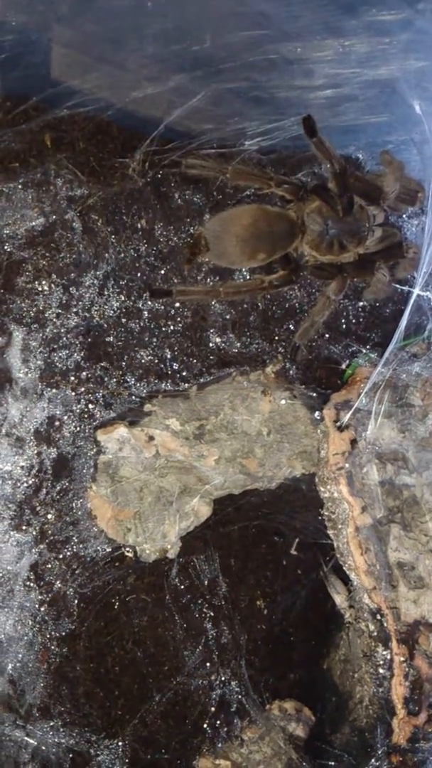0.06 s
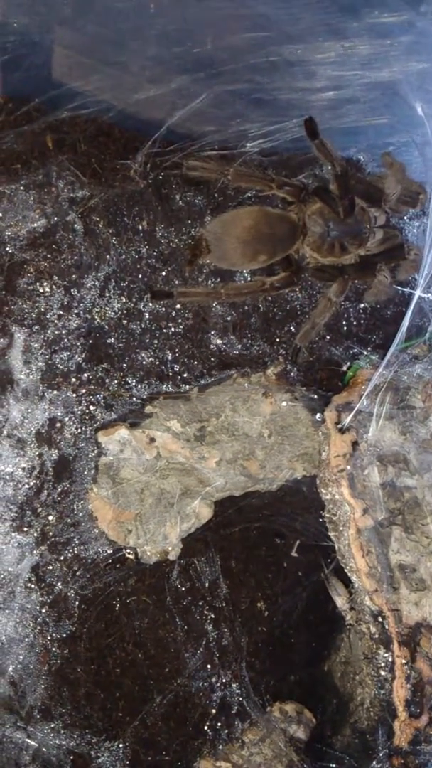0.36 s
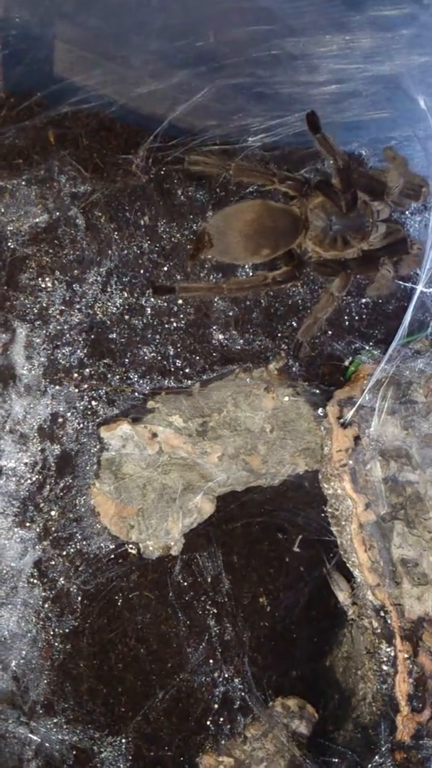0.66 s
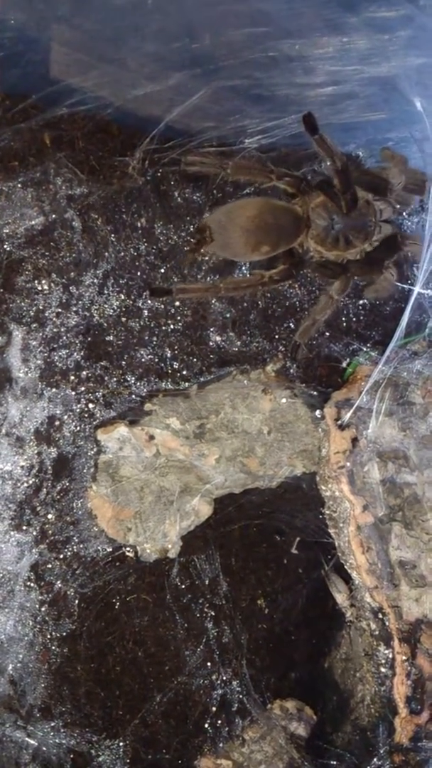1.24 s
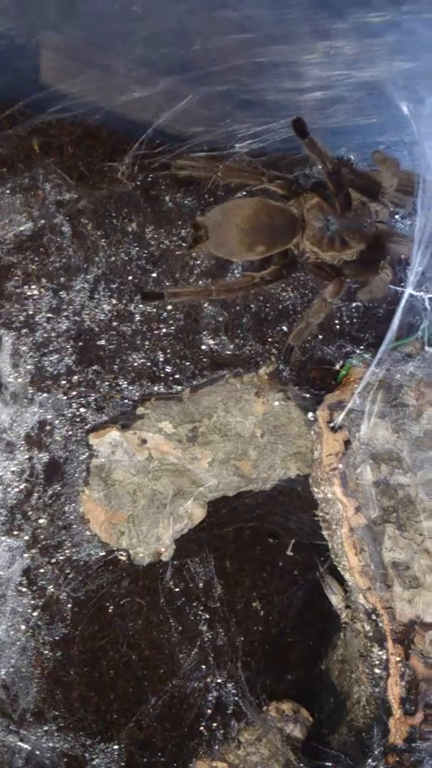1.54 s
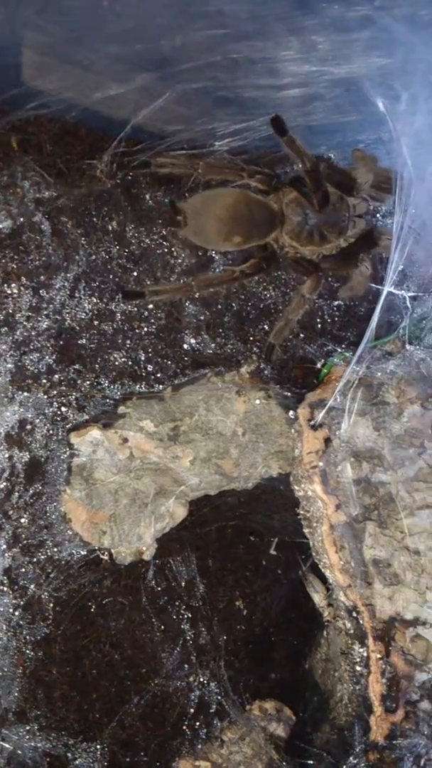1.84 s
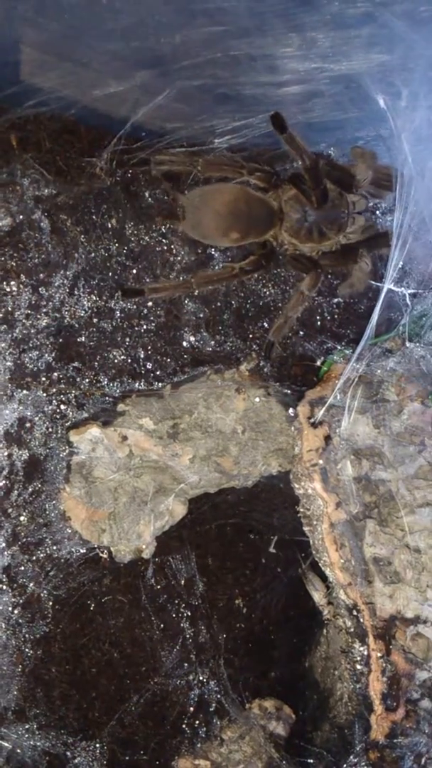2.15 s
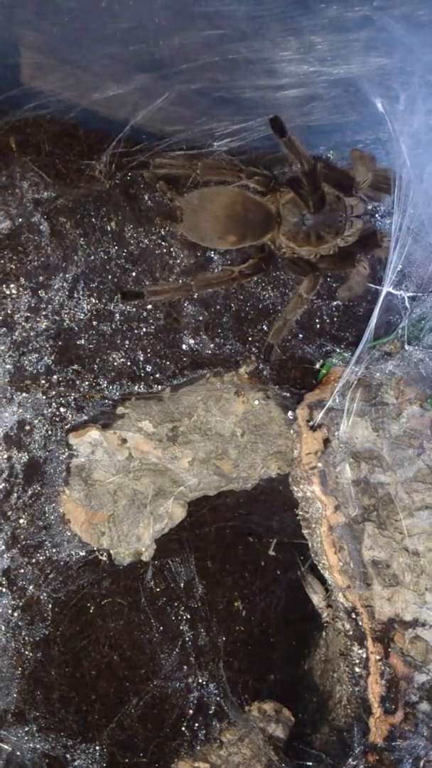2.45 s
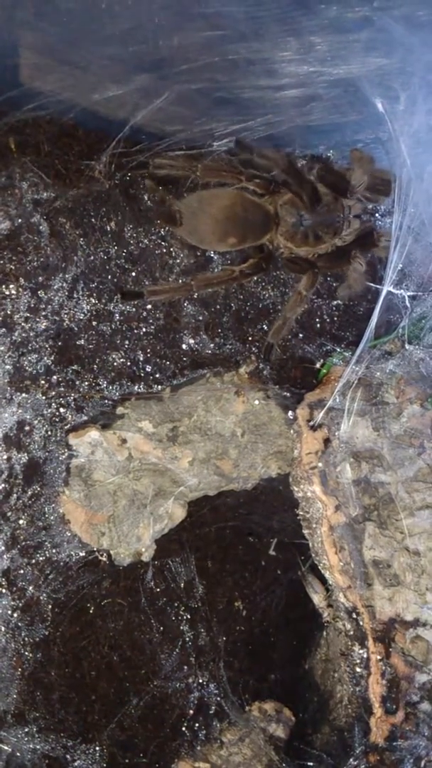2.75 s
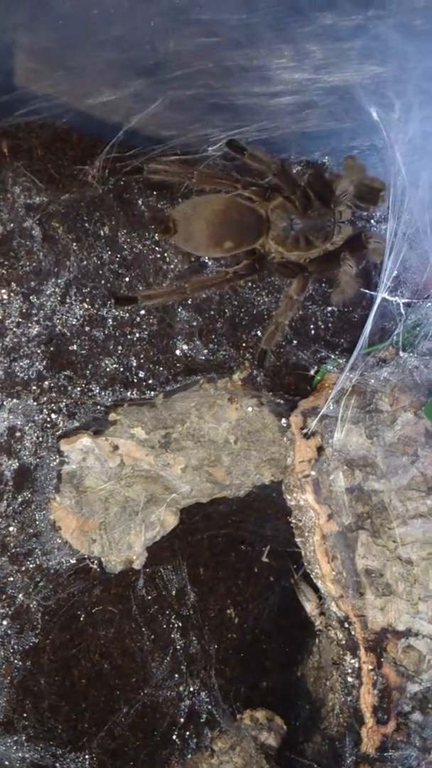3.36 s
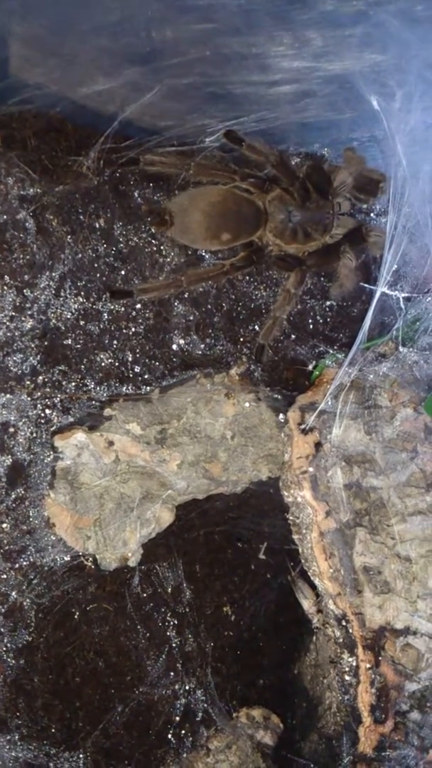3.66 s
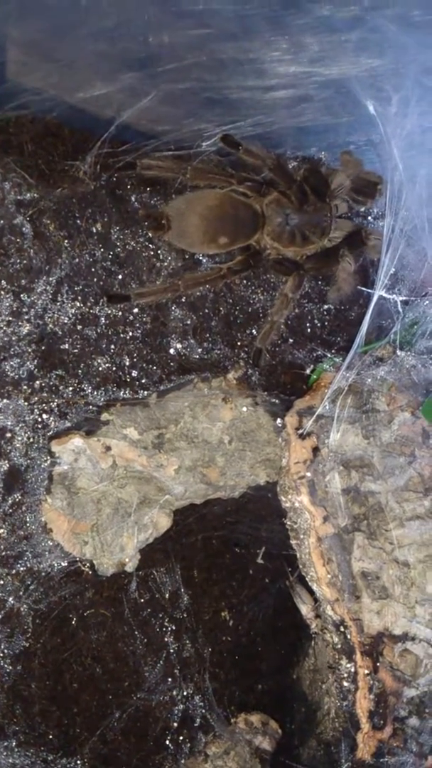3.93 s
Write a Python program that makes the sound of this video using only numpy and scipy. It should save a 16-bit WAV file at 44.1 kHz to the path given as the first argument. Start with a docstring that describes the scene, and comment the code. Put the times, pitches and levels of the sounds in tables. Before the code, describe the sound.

A tarantula's legs make a few faint, crisp ticks over a low room hum.

```python
"""Tarantula in a quiet room

A tarantula shifts in its enclosure: a short roll of soft low pulses, perhaps its drumming, then tiny
crisp ticks as its legs catch on silk and dry litter, with faint rustles and one falling squeak.
A machine hums nearby while a second low tone slowly sinks. Under it all lie room rumble,
microphone hiss and a thin electronic whine."""
import sys
import numpy as np
from scipy.fft import rfft, irfft, next_fast_len
from scipy.io import wavfile
from scipy.ndimage import uniform_filter1d, map_coordinates

SR = 44100
rng = np.random.default_rng(int(sys.argv[2]) if len(sys.argv) > 2 else 0)


def pcm_store(signal):
    """Save signal as 16-bit PCM."""
    levels = np.round(np.clip(np.atleast_2d(signal), -1, 1) * 32767)
    wavfile.write(sys.argv[1], SR, levels.astype(np.int16).T)


N = 176400


def leg_ticks():
    """Legs catch on silk and litter: bright snaps with a faint tail from the enclosure walls."""
    # one snap a row: start_s, level_db, tilt_db_per_octave
    snaps = [(1.199, -58, -1), (1.277, -58, -3), (1.292, -55, -6), (1.331, -52, -9.5), (1.347, -55, 1),
             (1.366, -51, -8), (1.708, -51.5, -3), (1.714, -63, 0), (1.747, -61, -3), (1.7753, -40.5, -5.5),
             (1.791, -46, 0), (1.814, -61, 4), (1.845, -55, 2), (1.9575, -51, 0), (1.9688, -34.5, 1.5),
             (2.219, -59, 7), (2.263, -58, 4)]
    # tone colour of a snap before its tilt: frequency_hz, relative_db
    spectrum = [(800, -44), (2200, -31), (3000, -28.5), (4900, -17.5), (5600, -23.5), (6400, -7.5),
                (7500, -18.5), (8600, -2), (10000, 2.5), (11000, -5.5), (12100, -1.5), (13300, -19),
                (15500, -29)]
    attack_s, snap_t60_s, tail_t60_s, tail_db = 0.00024, 0.01, 0.046, -19.5
    out, t = np.zeros(N), np.arange(SR // 20) / SR
    hz = np.fft.rfftfreq(len(t), 1 / SR)
    octaves = np.log2(np.maximum(hz, spectrum[0][0]))
    decay = amp(-60 * t / snap_t60_s) + amp(tail_db - 60 * t / tail_t60_s)
    fades = (1 - np.exp(-t / attack_s)) * (1 - t / t[-1])
    for start_s, level_db, tilt_db in snaps:
        burst = rfft(rng.standard_normal(len(t)) * decay)
        # even out the burst's chance peaks so that the colour sets the timbre
        local_power = np.abs(uniform_filter1d(np.abs(burst) ** 2, size=35))
        colour = amp(along(spectrum, hz) + tilt_db * octaves)
        snap = irfft(burst / np.sqrt(local_power) * colour, len(t)) * fades
        add(out, start_s, amp(level_db) * snap * np.linalg.norm(decay) / np.linalg.norm(snap))
    return out


def soft_pulses():
    """A roll of dull taps, perhaps drumming: each about two cycles in a smooth swell, with no ring."""
    # one tap a row: centre_s, peak_db
    taps = [(.9223, -52), (.9566, -52), (.9898, -52.5), (1.0316, -51), (1.0605, -53.5), (1.0909, -52),
            (1.1254, -54), (1.1594, -52.5), (1.1922, -53.5), (1.2258, -51.5), (1.2605, -53)]
    pitch_hz, width_s = 590, 0.0011
    out, t = np.zeros(N), np.arange(N) / SR
    for centre_s, peak_db in taps:
        near = np.abs(t - centre_s) < 10 * width_s
        offset_s = t[near] - centre_s
        wave = np.sin(2 * np.pi * (pitch_hz * offset_s + rng.random()))
        out[near] += amp(peak_db) * bell(offset_s, width_s) * wave
    return out


def rustles():
    """Soft brushing sounds that swell and fade, each in its own band of noise."""
    # one brush a row: centre_s, half_length_s, level_db, centre_hz
    brushes = [(0.137, 0.065, -78, 2410), (0.376, 0.045, -67, 272), (0.976, 0.074, -75.5, 1400),
               (1.582, 0.035, -75.5, 840), (1.625, 0.039, -77.5, 2520), (1.95, 0.043, -80, 1400)]
    width_octaves = 0.44
    out, t = np.zeros(N), np.arange(N) / SR
    for centre_s, half_length_s, level_db, centre_hz in brushes:
        band = lambda hz: bell(np.log2((hz + 1) / centre_hz), width_octaves)
        brush = unit(filtered(rng.standard_normal(N), band))
        out += amp(level_db) * bell(t - centre_s, half_length_s) * brush
    return out


def squeak():
    """A short, faint whistle that slides down, roughened by fast pitch jitter."""
    # the slide: time_s, pitch_hz, level_db
    slide = [(.04, 1140, -100), (.08, 1110, -83), (.12, 1073, -71), (.17, 1040, -78), (.26, 900, -84),
             (.32, 845, -110)]
    jitter_hz = 37.3
    pitch_hz, level_db = curves(slide)
    return tone(pitch_hz + jitter_hz * wobble(90), level_db)


def machine_hum():
    """A motor hums at its rotation rate and the next two harmonics, each swelling on its own."""
    # level of each harmonic: time_s, level_db
    first = [(0, -48), (.25, -46.5), (.6, -51), (.9, -49.5), (1.5, -50), (2.05, -53.5), (2.7, -55),
             (3.3, -56), (4, -57.5)]
    second = [(0, -55.5), (.35, -48.5), (.95, -48), (1.3, -53), (1.55, -56), (1.8, -75), (2.25, -72),
              (2.55, -60), (2.85, -71), (3.1, -60), (3.6, -61.5), (4, -73.5)]
    third = [(0, -60), (.9, -59.5), (1.8, -60.5), (2.15, -57.5), (2.5, -60.5), (3.1, -60.5), (3.65, -69.5),
             (4, -63)]
    rotation_hz = 65.28
    return sum(tone(rotation_hz * k, *curves(level)) for k, level in enumerate([first, second, third], 1))


def low_tones():
    """Mains hum, a fading drone, faint overtones and a sinking tone that beat against the motor."""
    # swells of the mains hum and the drone: time_s, level_db
    mains_level = [(0, -70), (.4, -74), (.7, -61.5), (1.8, -62.5), (2.9, -60.5), (3.3, -72), (3.55, -70),
                   (4, -75)]
    drone_level = [(0, -73), (.5, -60), (1.2, -74), (4, -81)]
    # steady overtones: pitch_hz, level_db
    overtones = [(213, -76.5), (246, -79)]
    # the sinking tone: time_s, pitch_hz, level_db
    sinking = [(0, 65.14, -70), (1.0, 62.6, -55), (1.8, 59.2, -65), (2.3, 58.36, -62.5), (2.9, 56.8, -60),
               (3.5, 54.4, -64), (4, 53.1, -62)]
    mains_hz, drone_hz = 179.8, 49.7
    mains = tone(mains_hz, *curves(mains_level))
    drone = tone(drone_hz, *curves(drone_level))
    return mains + drone + sum(tone(hz, db) for hz, db in overtones) + tone(*curves(sinking))


def room_rumble():
    """A bed of dull room noise that slowly eases."""
    # colour of the rumble: frequency_hz, relative_db
    spectrum = [(20, -21), (35, -18), (60, -1.5), (85, 1), (115, 1.5), (155, -1), (210, -2), (270, -9.5),
                (340, -13), (450, -24), (700, -36), (2000, -69)]
    # its rise and fall: time_s, level_db
    level = [(0, -61.5), (.4, -60.5), (1.1, -62), (1.6, -60), (2.4, -65.5), (3.3, -65.5), (4, -65.5)]
    return amp(*curves(level)) * noise(spectrum)


def hiss_and_whine():
    """Steady room air and microphone hiss, with a thin cluster of electronic tones on top."""
    # colour of the hiss: frequency_hz, relative_db
    spectrum = [(100, -0.5), (450, 0.9), (700, -1.5), (1000, -3.5), (1500, -6), (2200, -8.5), (3500, -10),
                (5600, -11.5), (7900, -11.5), (8700, -9.5), (9100, -5.5), (9550, -1.5), (10300, -3.5),
                (10600, -6.5), (11000, -11.5), (12000, -11), (13000, -12), (15500, -14)]
    # tones of the whine: pitch_hz, level_db
    whine = [(9491, -80.5), (9550, -81), (9609, -78.5), (9668, -85), (9765, -66)]
    hiss_db = -65.5
    return amp(hiss_db) * noise(spectrum) + sum(tone(hz, db) for hz, db in whine)


def tone(hz, db):
    """A sine of the given rms level that wavers slightly in pitch and strength."""
    waver_hz, waver_db = 0.085, 0.5
    cycles = np.cumsum(hz + waver_hz * wobble(1.8)) / SR + rng.random()
    return np.sqrt(2) * amp(db + waver_db * wobble(4.08)) * np.sin(2 * np.pi * cycles)


def noise(spectrum):
    """Coloured noise of rms 1."""
    return unit(filtered(rng.standard_normal(N), lambda hz: amp(along(spectrum, hz))))


def filtered(x, response):
    """Equalise x with a gain given as a function of frequency."""
    size = next_fast_len(N + SR // 2)
    return irfft(rfft(x, size) * response(np.fft.rfftfreq(size, 1 / SR)), size)[..., :N]


def wobble(rate_hz):
    """A smooth drift through rate_hz random points a second."""
    points = rng.standard_normal(int(N * rate_hz / SR) + 4)
    return map_coordinates(points, [np.arange(N) * rate_hz / SR])


def curves(rows):
    """One automation curve for each column after the time."""
    time_s, *columns = np.transpose(rows)
    return [np.interp(np.arange(N) / SR, time_s, column) for column in columns]


def along(spectrum, hz):
    """Read a spectrum's decibels on a log frequency axis."""
    points_hz, points_db = np.transpose(spectrum)
    return np.interp(np.log(hz + 1), np.log(points_hz + 1), points_db)


def bell(offset, width):
    """A Gaussian swell of height 1."""
    return np.exp(-.5 * (offset / width) ** 2)


def amp(db):
    """Decibels to gain."""
    return 10 ** (np.asarray(db) / 20)


def unit(x):
    """Scale to rms 1."""
    return x / np.sqrt(np.mean(x ** 2) + 1e-20)


def add(track, start_s, sound):
    """Mix a sound into the track."""
    part = track[round(start_s * SR):][:len(sound)]
    part += sound[:len(part)]


def scene():
    """The spider's small sounds over hum and rumble, in mono."""
    hum = machine_hum() + low_tones()
    return (hum + soft_pulses() + leg_ticks() + rustles() + squeak() + room_rumble())[None]


def record(dry):
    """The microphone adds hiss and whine; nothing passes above the band limit."""
    band_limit_hz = 15600
    return filtered(dry + hiss_and_whine(), lambda hz: hz < band_limit_hz)


dry = scene()
out = record(dry)
pcm_store(out)
```